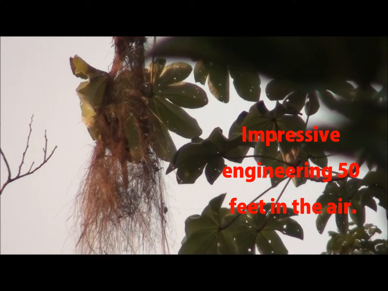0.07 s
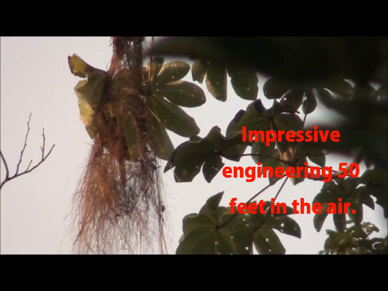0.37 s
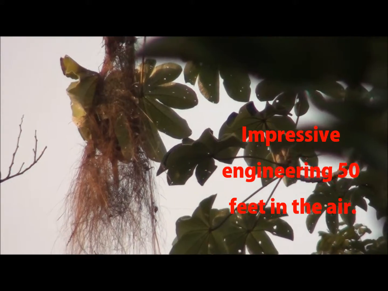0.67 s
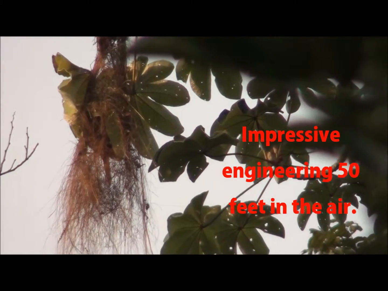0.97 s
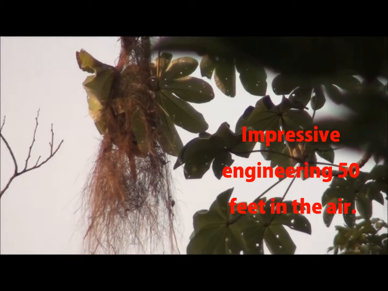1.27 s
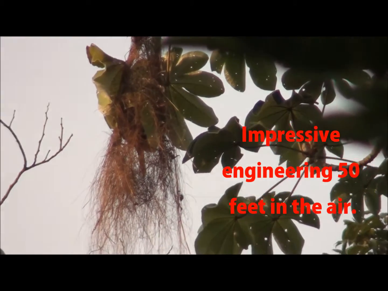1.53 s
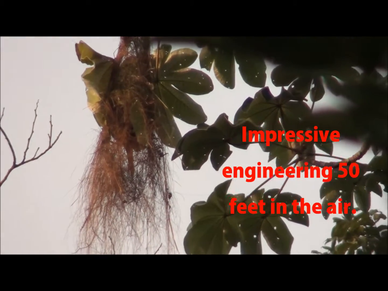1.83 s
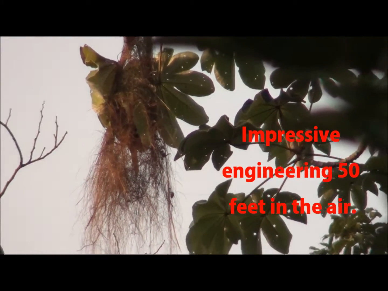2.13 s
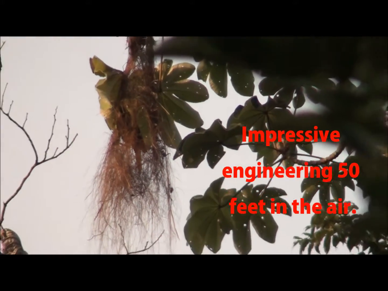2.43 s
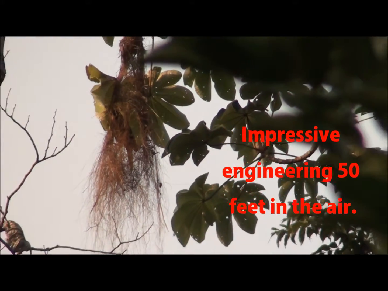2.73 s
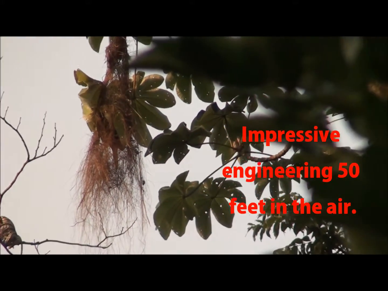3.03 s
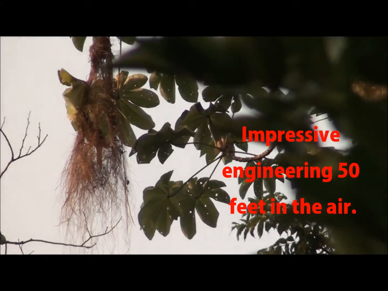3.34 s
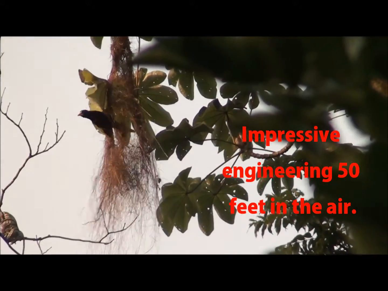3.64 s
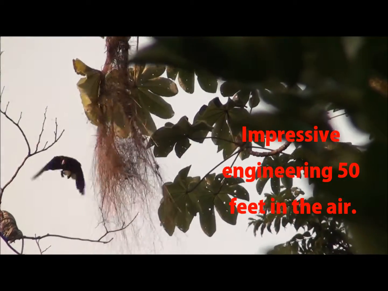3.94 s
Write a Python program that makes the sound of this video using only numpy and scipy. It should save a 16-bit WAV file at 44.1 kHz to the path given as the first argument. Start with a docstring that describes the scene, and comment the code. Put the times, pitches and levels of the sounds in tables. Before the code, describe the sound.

Insects drone throughout in a dense, shrill chorus over a soft forest rush, with a nearer one rattling short chirps two or three times a second. A small bird gives three faint rising whistles at about 0.3, 1, 1.8 and 2.5 seconds. Distant clucks and trills scatter behind. From about 2 seconds, twigs snap lightly and a far bird hoots softly while everything gradually fades toward 4 seconds.

```python
"""Insects on a forested hillside

Crickets pulse in a shrill chorus of narrow noise bands, below a fast buzz rasped in a wing resonance. A nearer
insect rattles out chirps, each wing stroke ringing a short tone. A small bird repeats three rising whistles,
twigs snap in damped resonances, and far hoots, trills and clucks scatter among the trees over a soft forest
rush and a faint hiss. Everything fades through the second half."""
import sys
import numpy as np
from scipy import signal
from scipy.fft import rfft, irfft
from scipy.io import wavfile

SR = 44100
rng = np.random.default_rng(int(sys.argv[2]) if len(sys.argv) > 2 else 0)


def wrap_up_sound(samples):
    """Save the sound to the file named by the first command line argument, as 16-bit audio."""
    columns = np.atleast_2d(samples).T
    # keep every value between -1 and 1, then stretch to whole-number steps
    tamed = np.clip(columns, -1, 1)
    steps = np.round(tamed * 32767).astype(np.int16)
    wavfile.write(sys.argv[1], SR, steps)


N = 176400

# groups of crickets: f/Hz, bandwidth/Hz, level/dB, pulse rate/Hz
CRICKET_GROUPS = [(6000, 110, -42, 8.7), (6560, 41, -38.5, 12), (7040, 35, -30, 10.9), (7078, 79, -31, 48),
                  (7190, 56, -33.5, 29), (7330, 61, -32.5, 30), (7336, 50, -32.5, 18), (7465, 150, -34, 70)]
# spectrum of the far chorus: f/Hz, relative level/dB
CHORUS_SPECTRUM = [(4200, -35), (5300, -19), (5750, -8.5), (6000, -3), (6400, 2), (6800, 3), (6960, 13.5),
                   (7400, 1.5), (7600, -18), (8000, 4), (9000, -20), (10000, -70)]


def crickets(depth=0.74, steadiness=0.55):
    """Incoherent superposition: many crickets at one pitch sum to a noise band that pulses loosely."""
    out = amp(-28.5) * noise(amp(read(CHORUS_SPECTRUM)))
    for hz, width, db, rate in CRICKET_GROUPS:
        cycles = np.cumsum(rate * (1 + 0.0472 * drift(3.73))) / SR + rng.random()
        pulses = np.exp(depth * np.cos(2 * np.pi * cycles))
        analytic = signal.hilbert(noise(band(hz, width)))
        tone = analytic.real / (abs(analytic) + 0.11) ** steadiness  # 0 a blur, 1 a steady voice
        out += amp(db) * unit(tone * pulses)
    return widen(out, 0.34)


# wing resonance of the buzz: f/Hz, relative level/dB
BUZZ_SPECTRUM = [(6800, -71), (7550, -30.5), (7780, -7.5), (7960, -2.5), (8280, -0.5), (8500, -3.5),
                 (8760, -10.5), (9050, -21.5), (9400, -36), (10200, -95)]


def buzz(rasp_hz=93.4, depth=0.33):
    """Amplitude modulation: a steady train of rasps excites one broad wing resonance."""
    phase = 2 * np.pi * np.cumsum(rasp_hz * (1 + 0.006 * drift(3))) / SR
    rasps = 1 + depth * np.cos(phase) - .12 * np.cos(2 * phase)
    resonance = noise(amp(read(BUZZ_SPECTRUM)))
    return amp(-25.6) * widen(unit(resonance * rasps), 0.25)


# near insect's chirps: t/s, duration/s, level/dB, stroke rate/Hz, opening strength (0-1)
INSECT_CHIRPS = [(.009, 0.13, -17.5, 144, 0.54), (0.362, .145, -16.5, 153, 0.31),
                 (0.713, 0.14, -16, 153, 0.34), (1.075, 0.15, -18, 182, 0.47),
                 (1.482, 0.13, -16, 150, 0.36), (1.962, .140, -16.5, 150, 0.33),
                 (2.401, 0.13, -17.5, 170, 0.45), (2.832, 0.12, -17, 156, 0.48),
                 (3.301, 0.13, -17, 157, 0.29), (3.695, .140, -16, 143, 0.5)]


def near_insect(pitch_hz=5604, fall_hz=260, stroke_s=0.0058):
    """Stridulation: each wing stroke rings a short falling tone; the strokes swell, then die away."""
    out, u = np.zeros(N), np.arange(0, 1, 1 / (stroke_s * SR))
    for start, length, db, rate, opening in INSECT_CHIRPS:
        jitter = rng.standard_normal((30, 3))[:int(length * rate) + 1]
        for k, (late, loud, sharp) in enumerate(jitter):
            progress = k / rate / length
            swell = opening + (1 - opening) * np.exp(-((progress - .56) / .21) ** 2)
            release = np.clip((1 - progress) / 0.28, 0, 1)
            stroke = np.sin(np.pi * u) ** 0.9 * sine(pitch_hz + 35 * sharp - fall_hz * (u - .5))
            add(out, start + k / rate + 3e-5 * late, amp(db + 2 * loud) * swell * release * stroke)
    return forest(out, wet_db=-3.5, t60=0.3, spread=0.57)


# small bird's notes: t/s, starting f/Hz, level/dB
BIRD_NOTES = [(0.307, 4700, -32), (.378, 4510, -39), (.456, 4510, -32.5), (1.035, 4710, -31),
              (1.101, 4600, -32), (1.18, 4520, -33.5), (1.783, 4740, -30.5), (1.851, 4700, -32.5),
              (1.926, 4520, -33.5), (2.499, 4760, -32), (2.569, 4600, -35), (2.647, 4580, -33)]


def small_bird(note_s=0.032, rise_hz=1200):
    """Frequency modulation: each thin whistle opens flat, then leaps upward along a logistic curve."""
    out, u = np.zeros(N), np.arange(0, 1, 1 / (note_s * SR))
    leap = 1 / (1 + np.exp((0.61 - u) / 0.097))
    swell = np.sin(np.pi * u) ** .8 * (0.65 + leap)
    for start, hz, db in BIRD_NOTES:
        add(out, start, amp(db) * swell * sine(hz + rise_hz * leap))
    return forest(out, wet_db=3, t60=0.69, spread=0.65)


# resonances of a twig: f/Hz, bandwidth/Hz, T60/s
TWIG_MODES = [(1424, 300, 0.032), (2250, 240, 0.036), (3560, 1360, 0.025)]
# snaps: t/s, level/dB of the low, middle and high resonance
TWIG_SNAPS = [(1.91, -30, -35, -44), (2.161, -25.5, -29.5, -30.5), (2.191, -31, -39, -52),
              (2.227, -51, -44, -34), (2.296, -33, -35, -31), (2.364, -36.5, -33.5, -30),
              (2.430, -35, -46, -33), (3.178, -34.5, -32.5, -36), (3.308, -37, -41, -55),
              (3.599, -32, -53, -55)]


def twigs():
    """Damped vibration: each dry snap excites three resonances that decay exponentially."""
    out, t = np.zeros(N), np.arange(SR // 10) / SR
    for k, (hz, width, t60) in enumerate(TWIG_MODES):
        ring = noise(band(hz, width))[0]
        envelope = np.minimum(t / .002, 1) * amp(-60 * t / t60)
        for start, *levels in TWIG_SNAPS:
            snap = ring[round(start * SR):][:len(t)] * envelope
            add(out, start, amp(levels[k]) * snap * np.linalg.norm(envelope) / np.linalg.norm(snap))
    return forest(out, wet_db=-6, t60=.55, spread=1.0)


# far bird's hoots: t/s, duration/s, f/Hz, level/dB
BIRD_HOOTS = [(1.83, 0.087, 546.5, -48), (2.27, 0.058, 545, -46), (2.41, 0.1, 542, -50),
              (2.68, 0.2, 550, -55), (2.81, 0.13, 542, -54), (3.39, .10, 552, -40),
              (3.60, .13, 555.6, -42.5), (3.74, 0.091, 634, -45), (3.82, 0.053, 541, -42.5),
              (3.89, 0.076, 605, -48)]


def far_bird():
    """Reverberation at a distance: soft, slightly arched tones arrive about as strong as their echoes."""
    out = np.zeros(N)
    for start, length, hz, db in BIRD_HOOTS:
        arch = np.sin(np.pi * np.arange(0, length, 1 / SR) / length)
        add(out, start, amp(db) * arch * sine(hz * (1 + 0.059 * (arch - .8))))
    return forest(out, wet_db=-0.5, t60=1.0, spread=0.56)


# distant trills: t/s, duration/s, f/Hz, bandwidth/Hz, level/dB, pulse rate/Hz
FAR_TRILLS = [(-0.5, 4, 1680, 56, -59, 15), (0, 2, 1385, 150, -61.5, 10), (2.5, .7, 1320, 70, -57, 13),
              (3.0, 0.13, 2390, 110, -57, 20), (0, 2, 3900, 260, -59.5, 15)]
# distant clucks: t/s, f/Hz, level/dB
FAR_CLUCKS = [(.175, 1495, -42.5), (.24, 1490, -44), (0.729, 1255, -46), (.97, 1524, -41.5),
              (1.035, 1560, -45), (1.105, 1540, -48), (1.569, 1526, -40.5), (1.85, 1310, -51),
              (3.095, 1330, -44), (3.11, 1110, -38.5), (3.57, 1550, -44)]


def far_animals(trill_depth=0.63, cluck_s=0.017, fall_hz=160):
    """Modulation in small animals' calls: trills pulse in amplitude, clucks fall in frequency."""
    out = np.zeros(N)
    for start, length, hz, width, db, rate in FAR_TRILLS:
        cycles = np.cumsum(rate * (1 + 0.16 * drift(3.6))) / SR
        pulses = np.exp(trill_depth * np.cos(2 * np.pi * cycles))
        trill = unit(noise(band(hz, width))[0] * pulses)[:round(length * SR)]
        add(out, start, amp(db) * trill * signal.windows.tukey(len(trill), .1))
    u = np.arange(0, 1, 1 / (cluck_s * SR))
    for start, hz, db in FAR_CLUCKS:
        add(out, start, amp(db) * np.sin(np.pi * u) * sine(hz - fall_hz * (u - .5)))
    return forest(out, wet_db=1, t60=0.65, spread=2.4)


# a low forest rush and a high hiss, with a gap near 10 kHz: f/Hz, relative level/dB
BACKGROUND_SPECTRUM = [(20, -22), (50, -9), (110, -4), (220, 0.5), (600, 1), (1100, -0.5), (1500, -1),
                       (1900, -2.5), (3000, -7), (4500, -8.5), (9000, -26.5), (10000, -25), (12000, -12),
                       (15500, -13.5)]
# likeness of left and right: f/Hz, correlation coefficient
BACKGROUND_CORRELATION = [(50, 0.98), (160, 0.75), (270, 0.53), (450, 0.35), (740, 0.15), (1220, -0.31),
                          (2000, -0.17), (3300, .3), (6000, 0.8), (11000, 1)]
# balance: f/Hz, left minus right level/dB
BACKGROUND_BALANCE = [(60, 0), (200, -0.5), (400, -1), (700, -3), (1300, -2.1), (4400, 0)]


def background(crossfade_at_s=2.02, crossfade_s=.11, crossfade_db=-3):
    """Partial coherence: left and right share part of a noise, giving a wide rush and a centred hiss."""
    left, independent = rfft(noise(amp(read(BACKGROUND_SPECTRUM))))
    correlation = np.clip(read(BACKGROUND_CORRELATION), -1, 1)
    right = correlation * left + np.sqrt(1 - correlation ** 2) * independent
    lean = amp(read(BACKGROUND_BALANCE) / 2)
    spectrum = np.array([left * lean, right / lean])
    # a brief dip in the background's midrange, like an edit crossfade
    midrange = irfft(spectrum * band(2500, 2500), N)
    dip = amp(crossfade_db * np.exp(-((np.arange(N) / SR - crossfade_at_s) / crossfade_s) ** 4))
    return amp(-41.5) * (irfft(spectrum, N) + (dip - 1) * midrange)


def forest(x, wet_db, t60, spread):
    """Scattering: trunks and leaves add sparse, decaying echoes to the direct sound."""
    t = np.arange(SR) / SR
    echoes = rng.standard_normal((2, SR)) * (rng.random((2, SR)) < 1 / 20)
    echoes *= amp(-60 * t / t60) * (t > .002)
    tail = widen(echoes / np.linalg.norm(echoes[0]), spread)
    return x + amp(wet_db) * signal.fftconvolve(x[None], tail, axes=1)[:, :N]


def amp(db):
    """Amplitude ratio of a level in decibels."""
    return 10 ** (np.asarray(db) / 20)


def unit(x):
    """Normalisation to rms 1."""
    return x / np.sqrt(np.mean(abs(x) ** 2) + 1e-20)


def read(points):
    """Interpolation of a table over log frequency, at every bin."""
    f, value = np.transpose(points)
    return np.interp(np.log(np.fft.rfftfreq(N, 1 / SR) + 1), np.log(f), value)


def add(mix, start, sound):
    """Superposition of a sound from a start time; negative times count as 0."""
    part = mix[max(round(start * SR), 0):][:len(sound)]
    part += sound[:len(part)]


def sine(hz):
    """A tone whose phase is the integral of its frequency."""
    return np.sin(2 * np.pi * np.cumsum(hz) / SR)


def noise(gain):
    """Spectral shaping of two independent noises, to rms 1."""
    return unit(irfft(rfft(rng.standard_normal((2, N))) * gain, N))


def band(hz, width):
    """Magnitude response of a steep-sided resonance."""
    return 1 / (1 + ((np.fft.rfftfreq(N, 1 / SR) - hz) / (width / 2)) ** 4) ** .5


def drift(cutoff_hz):
    """Slow random fluctuation: low-pass noise of rms 1."""
    return noise(band(0, 2 * cutoff_hz))[0]


def widen(pair, spread):
    """Middle and side to left and right; spread weights the side."""
    middle, side = pair
    return np.array([middle + spread * side, middle - spread * side]) / np.sqrt(1 + spread ** 2)


def scene():
    """Linear superposition of all the voices of the hillside."""
    return (background() + crickets() + buzz() + near_insect()
            + small_bird() + twigs() + far_bird() + far_animals())


def record(dry, fade_from_s=1.9, fade_per_s=0.3, cutoff_hz=15850):
    """Attenuation: a linear fade in amplitude, then a low-pass band limit."""
    fade = np.clip(1 - fade_per_s * (np.arange(N) / SR - fade_from_s), 0, 1)
    lowpass = signal.firwin(511, cutoff_hz, window=("kaiser", 9), fs=SR)
    return signal.oaconvolve(dry * fade, lowpass[None], "same")


dry = scene()
out = record(dry)
wrap_up_sound(out)
```